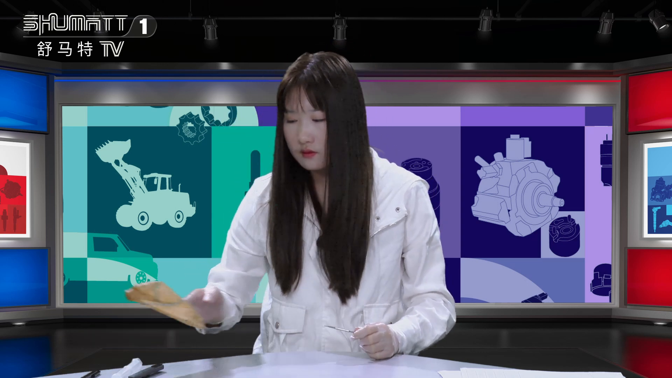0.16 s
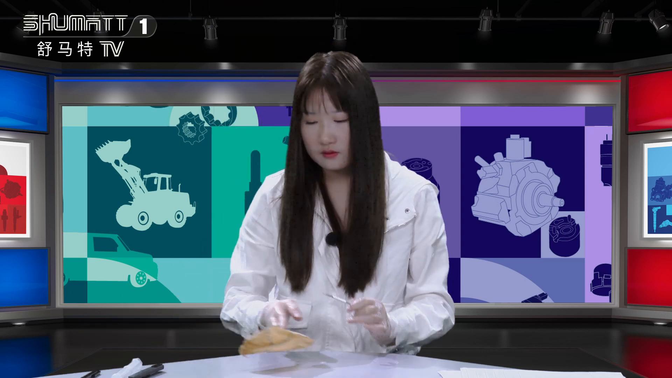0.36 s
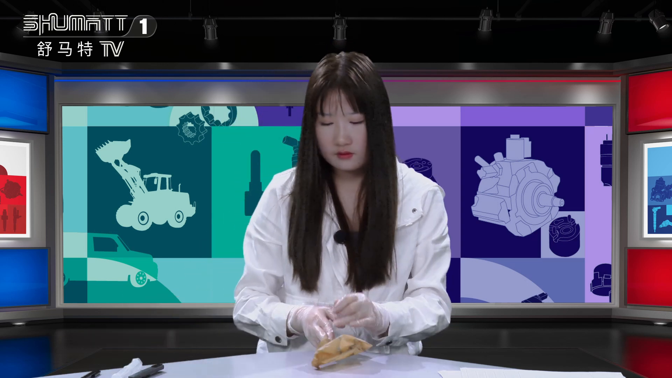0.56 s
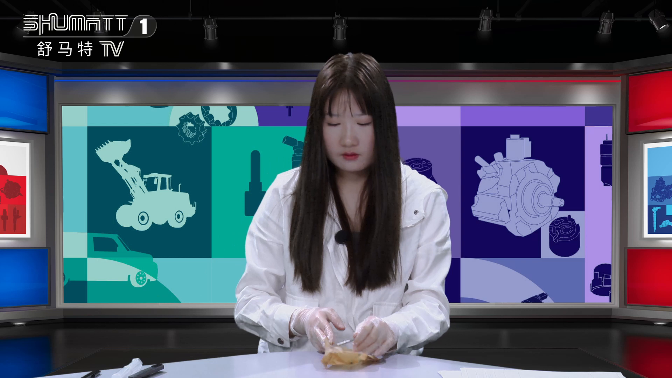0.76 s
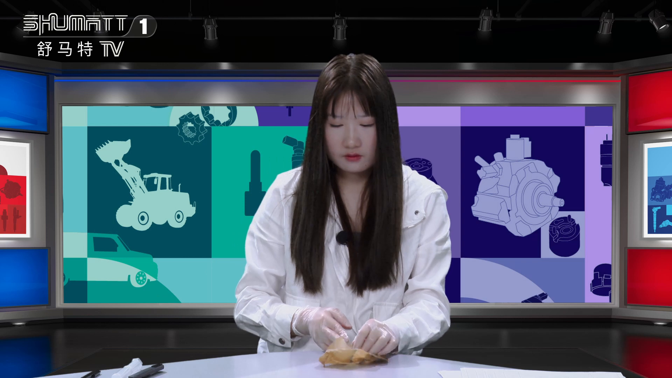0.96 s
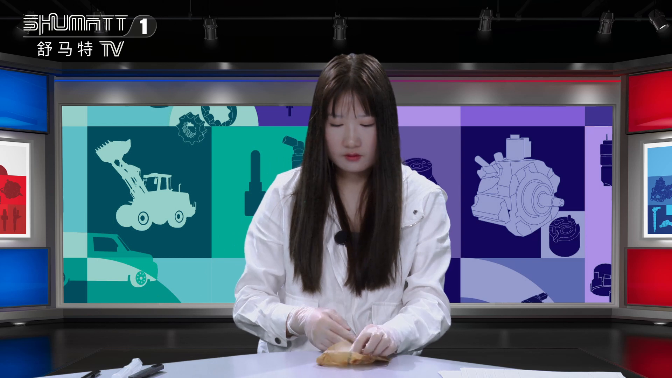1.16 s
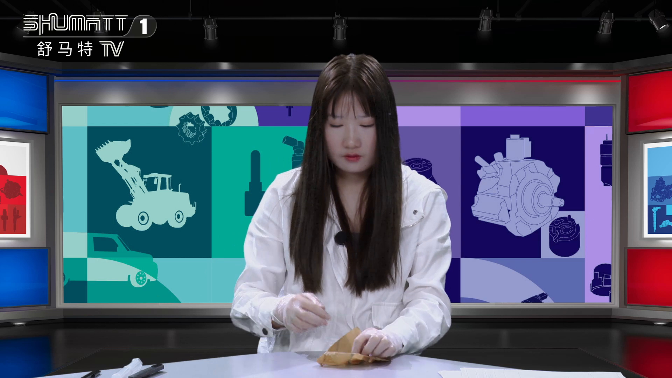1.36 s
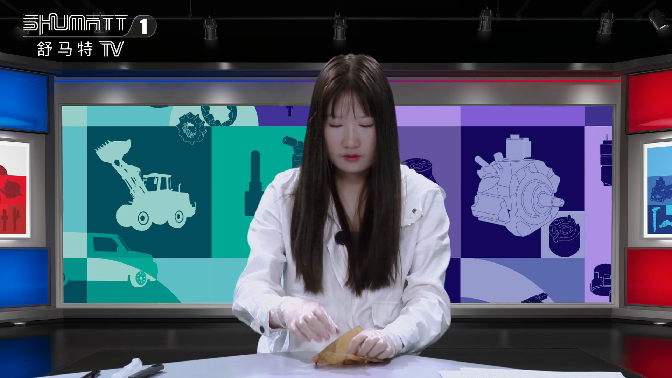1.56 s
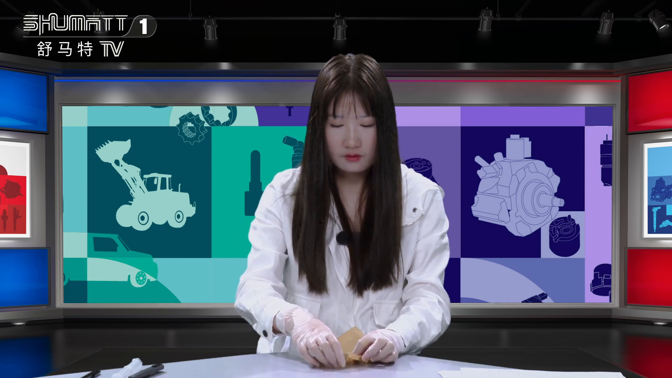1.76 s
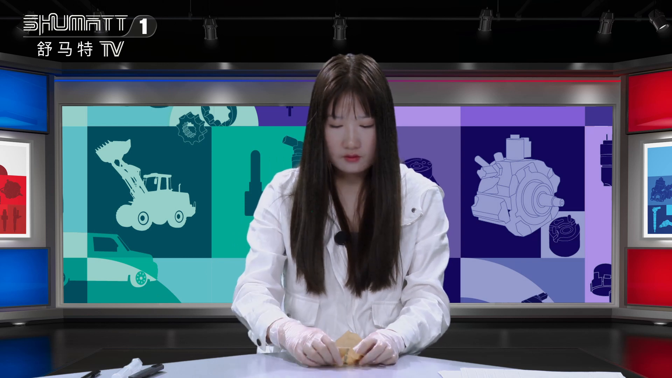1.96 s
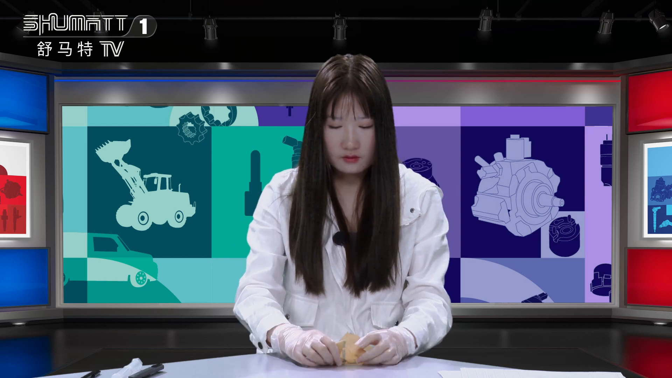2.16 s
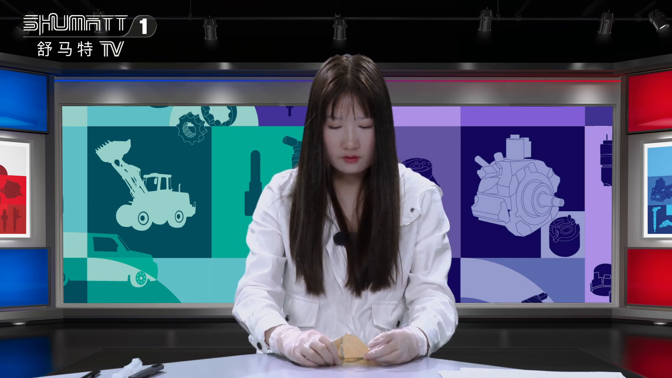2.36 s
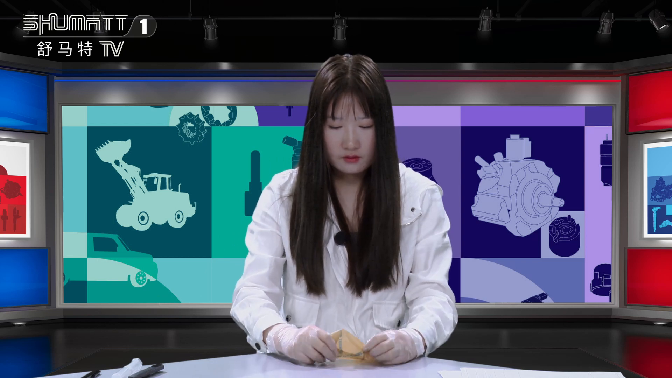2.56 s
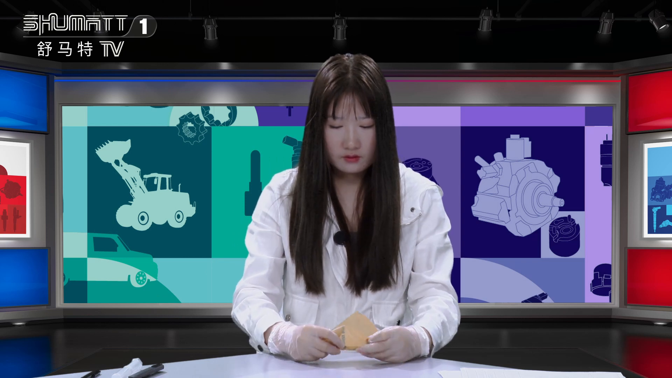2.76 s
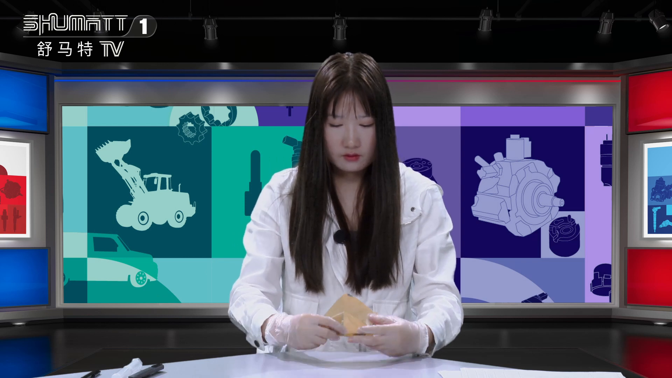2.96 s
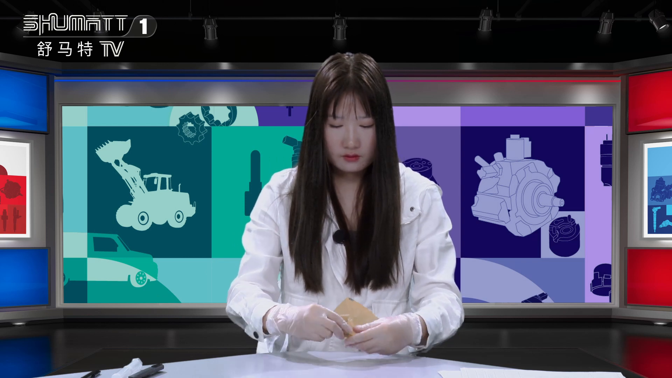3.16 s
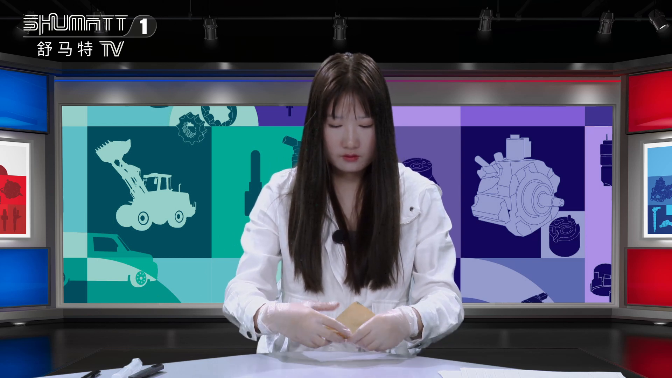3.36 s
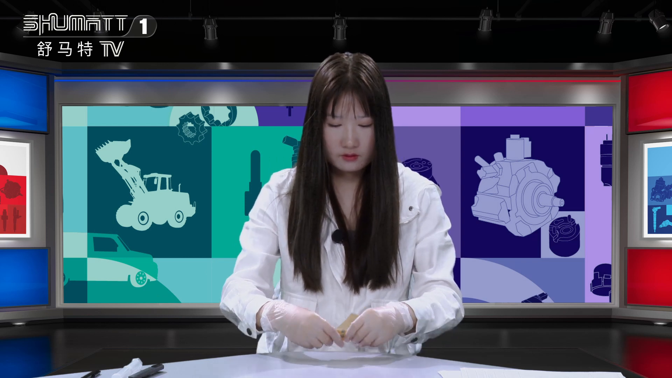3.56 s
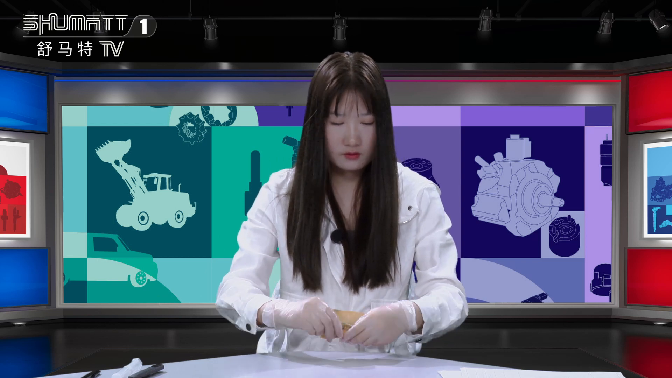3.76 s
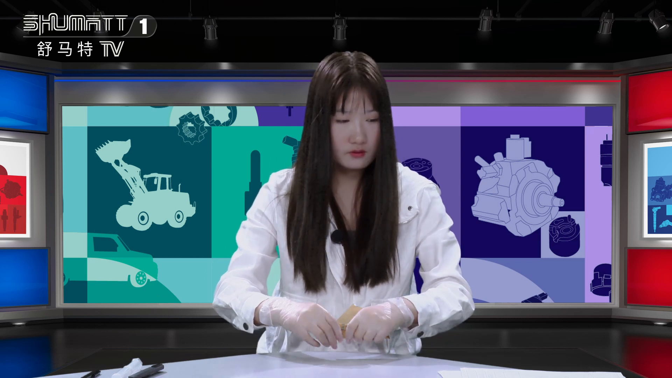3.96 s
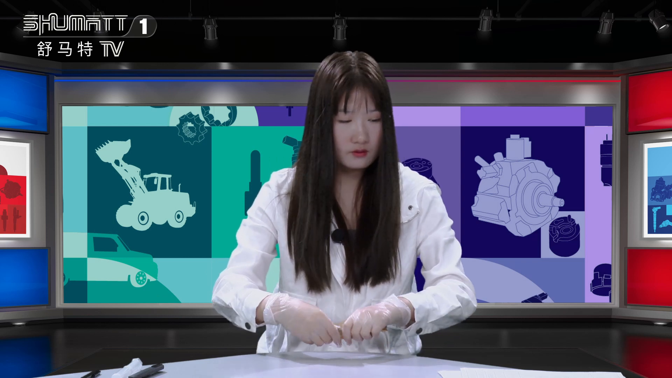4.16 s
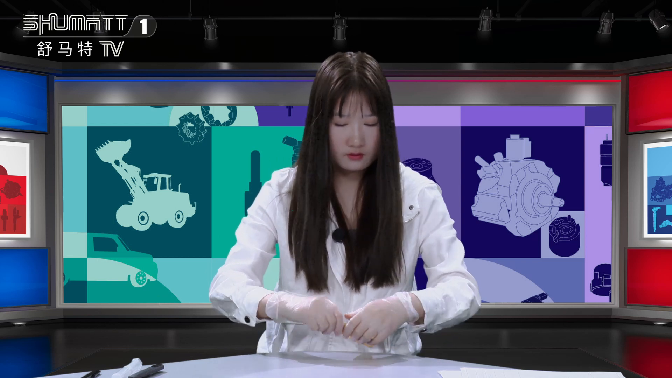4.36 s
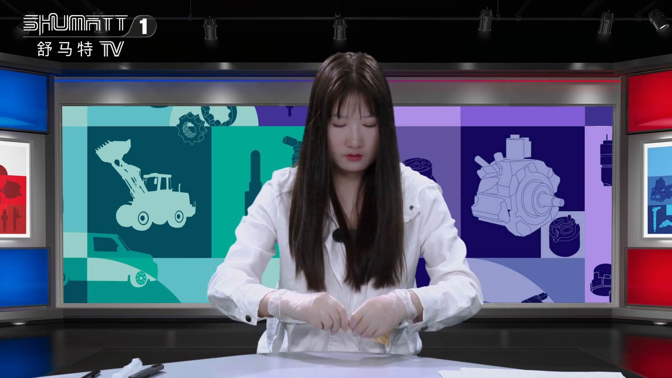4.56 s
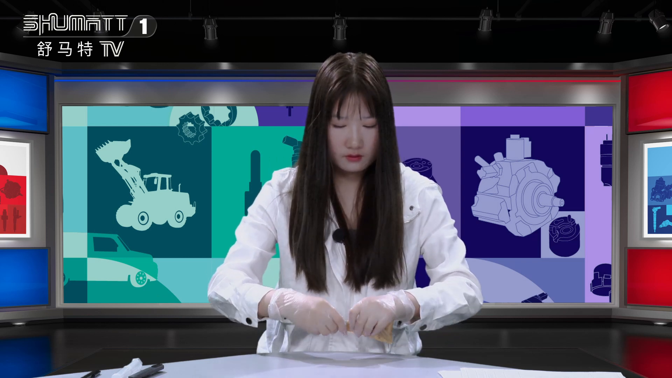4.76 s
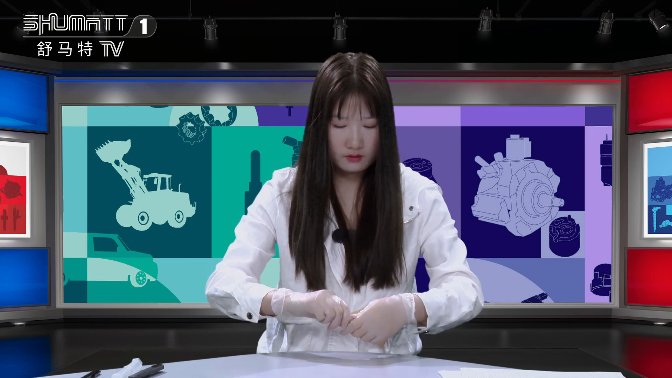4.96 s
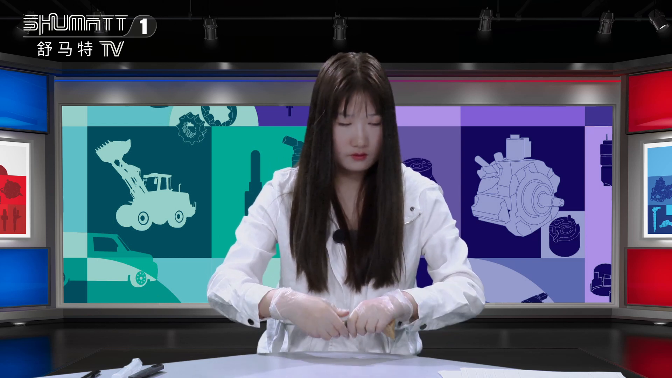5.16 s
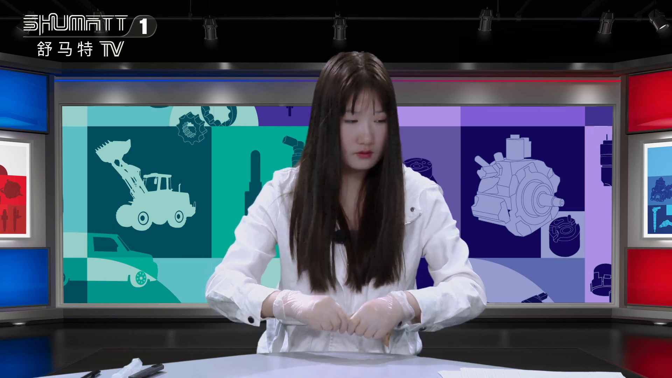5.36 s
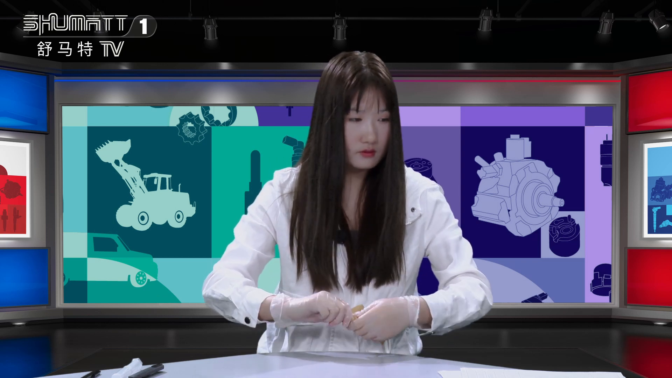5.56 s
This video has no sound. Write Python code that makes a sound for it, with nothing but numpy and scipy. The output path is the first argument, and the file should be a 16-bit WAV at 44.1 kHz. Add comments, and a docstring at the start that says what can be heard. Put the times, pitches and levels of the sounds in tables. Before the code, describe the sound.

Hands crease and fold stiff paper at a quiet indoor desk, starting nearly silent, then crackling, popping and rustling ever more densely up close.

```python
"""Stiff paper folded on a desk

Hands unwrap and fold stiff paper in a quiet, dry room, close to a small mono microphone.
Creases snap as noise-excited resonances, over a rustle of band-coloured hiss and tiny random crackles.
The sheet pops and flexes, knuckles bump the desk, and a fingertip rubs a fold as a gliding band of noise.
Close reflections colour the snaps, pops and bumps; faint room noise, bass-heavy hiss with a hum-like
peak near 50 Hz, rumbles behind."""
import sys
import numpy as np
from scipy import signal
from scipy.fft import rfft, irfft
from scipy.io import wavfile
from scipy.ndimage import uniform_filter1d

SR = 44100
rng = np.random.default_rng(int(sys.argv[2]) if len(sys.argv) > 2 else 0)


def gain_from_db(level_db):
    """Convert decibel levels to linear amplitude factors (20 dB per decade)."""
    decades = np.asarray(level_db, float) / 20
    return 10 ** decades


def to_wav(s):
    """Save 16-bit WAV."""
    ch = np.atleast_2d(s).T  # columns
    pcm = np.round(np.clip(ch, -1, 1) * 32767)  # PCM
    wavfile.write(sys.argv[1], SR, pcm.astype(np.int16))


N = 251370  # length [samples]

# loud creases that buckle, each level an rms over 4 ms before reflections:
# (time [s], panel ring [Hz], ring level [dB], crack centre [Hz], crack level [dB])
SNAPS = [(0.234, 2800, -55, 6000, -70), (0.427, 2200, -52.5, 6000, -66), (0.65, 3050, -33.5, 7200, -35),
         (0.6992, 1400, -44, 7160, -49), (0.7497, 1240, -40.5, 5870, -55), (0.7905, 1490, -41, 8360, -47),
         (0.837, 1530, -45.5, 8600, -56), (0.9808, 3600, -35.5, 7500, -38), (1.011, 2600, -24, 8700, -23),
         (1.1475, 2200, -35, 8100, -67), (1.1931, 3750, -43, 7100, -34.5), (1.2544, 1420, -39, 9100, -54),
         (1.3835, 3430, -43, 6030, -64), (1.6099, 1540, -46, 8650, -46), (1.6518, 890, -45, 6900, -46),
         (1.6703, 4940, -34, 12100, -28), (1.7184, 1510, -30, 5300, -24.5), (1.771, 2650, -30, 9600, -32),
         (1.8772, 2900, -38.5, 7900, -32.5), (1.9826, 3860, -29, 7300, -57),
         (2.164, 2900, -35.5, 13000, -45), (2.2049, 880, -36.5, 9400, -60),
         (2.3127, 1390, -30, 11300, -24.5), (2.4467, 1920, -46, 9900, -35), (2.5217, 1340, -31, 6000, -26),
         (2.5591, 1390, -28.5, 12000, -13.5), (2.5779, 3430, -22, 7200, -48),
         (2.5928, 1420, -31.5, 7200, -25.5), (2.625, 1540, -31.5, 10800, -51),
         (2.705, 2370, -30, 7600, -58), (2.757, 1980, -42, 10500, -33), (2.803, 3210, -57, 7900, -39),
         (2.848, 2300, -25, 6000, -38), (2.8918, 2530, -35.5, 6000, -34), (3.0084, 4000, -38, 6600, -60),
         (3.0338, 4330, -42, 8900, -35), (3.0675, 3100, -29, 7900, -26.5), (3.1837, 900, -57, 7760, -29),
         (3.1916, 4160, -35.5, 9300, -40), (3.2, 3600, -27.5, 10000, -26), (3.2296, 1010, -26.5, 6900, -53),
         (3.2792, 2670, -27.5, 6200, -31), (3.282, 2930, -33, 7540, -24.5),
         (3.2868, 4300, -31.5, 7400, -45), (3.3146, 3650, -28, 14400, -26.5),
         (3.3756, 1180, -33.5, 10500, -28.5), (3.3965, 4240, -26, 11000, -25),
         (3.458, 4180, -38.5, 5600, -52), (3.493, 4900, -47, 5800, -35.5), (3.5315, 1800, -40, 7700, -42),
         (3.5604, 3440, -24.5, 9800, -22), (3.5682, 4280, -24, 6100, -44),
         (3.6124, 5000, -28, 12300, -18.5), (3.6427, 3200, -20.5, 9400, -16.5),
         (3.6476, 1510, -25.5, 7440, -24.5), (3.6814, 3830, -30.5, 9800, -43),
         (3.6883, 1310, -28, 9500, -30.5), (3.7244, 1590, -31, 10600, -33.5),
         (3.792, 4800, -26.5, 6250, -43), (3.7973, 3900, -32.5, 7900, -50), (3.915, 5000, -55, 9050, -26.5),
         (3.931, 4020, -31, 8100, -26), (3.9428, 2880, -19.5, 7000, -15), (4.009, 4070, -50, 11600, -28.5),
         (4.0364, 2700, -37, 10100, -51), (4.0921, 3670, -38, 9000, -55), (4.1696, 1660, -30.5, 9400, -35),
         (4.1893, 1130, -33, 5800, -34), (4.2069, 3700, -22.5, 6900, -27), (4.231, 1680, -32.5, 6100, -52),
         (4.3394, 3700, -32, 9700, -48), (4.3634, 4700, -35.5, 9600, -31.5), (4.424, 1530, -42, 7300, -38),
         (4.5042, 1560, -23.5, 9200, -43), (4.5116, 4100, -19.5, 12100, -16.5),
         (4.537, 1240, -30, 8300, -42), (4.5425, 1370, -34, 5800, -32), (4.582, 3580, -50, 12300, -28.5),
         (4.6055, 1290, -32.5, 6500, -44), (4.6185, 3940, -34, 9650, -33), (4.656, 4180, -25.5, 6200, -47),
         (4.6611, 1320, -23.5, 10700, -14), (4.6783, 4200, -22.5, 7960, -21),
         (4.7004, 2570, -21, 8160, -20), (4.7369, 3700, -25, 11200, -21.5), (4.748, 4370, -25, 6900, -25),
         (4.765, 2690, -36, 5700, -51), (4.7728, 3180, -20.5, 13300, -18), (4.7831, 1440, -31, 8600, -30),
         (4.788, 2880, -24.5, 7500, -42), (4.7953, 3670, -20, 10200, -17), (4.835, 2900, -26.5, 9800, -49),
         (4.842, 3510, -36, 10500, -28), (4.8766, 3460, -32, 11800, -25), (4.9483, 1490, -34.5, 6800, -33),
         (4.9672, 3800, -29, 7000, -23.5), (5.01, 4300, -27, 7100, -23.5), (5.043, 1210, -33.5, 5570, -35),
         (5.0934, 3700, -21.5, 6200, -45), (5.1432, 1280, -34.5, 7150, -37),
         (5.1589, 4200, -24.5, 6100, -37), (5.1852, 3200, -21.5, 11700, -21), (5.203, 3050, -32, 6100, -48),
         (5.243, 3920, -31, 8400, -34), (5.2577, 4730, -22.5, 7760, -19.5),
         (5.2727, 2030, -27.5, 5900, -46), (5.326, 3030, -37, 7300, -34.5), (5.347, 3770, -41, 5860, -31.5),
         (5.3617, 3900, -39, 8100, -36), (5.4229, 3350, -21, 10200, -26), (5.4627, 2080, -28, 9600, -39),
         (5.4783, 2220, -34.5, 7700, -52), (5.508, 4400, -28.5, 9800, -23.5),
         (5.6722, 2400, -36.5, 7900, -47), (5.6966, 3800, -24, 7600, -53)]
# the whole sheet pops in or out of shape, level as above: (time [s], pitch [Hz], level [dB])
POPS = [(0.6883, 170, -44.5), (0.7802, 320, -41), (1.012, 750, -37.5), (1.226, 348, -35),
        (1.4559, 410, -44), (1.72, 483, -34), (1.7729, 382, -35.5), (1.8786, 410, -40.5),
        (2.1655, 980, -36), (2.2063, 665, -47), (2.3163, 610, -30.5), (2.451, 636, -34.5),
        (2.4635, 553, -35.5), (2.524, 555, -26), (2.8981, 590, -40), (3.1865, 696, -27.5),
        (3.1999, 800, -29), (3.2316, 780, -30.5), (3.2881, 646, -34), (3.5633, 430, -34), (3.641, 764, -31),
        (3.6892, 640, -32.5), (3.7258, 920, -39), (3.7677, 760, -39), (4.0933, 506, -42), (4.208, 620, -29),
        (4.424, 470, -35.5), (4.5133, 550, -22.5), (4.6615, 670, -23.5), (4.699, 474, -34),
        (4.949, 710, -35.5), (4.992, 694, -32), (5.0446, 554, -40.5), (5.4255, 546, -35.5)]
# rustle spectrum as heard: paper colour, then a steep treble cutoff from 16 kHz that is not the paper's:
# (frequency [Hz], relative density [dB per Hz])
RUSTLE_SPECTRUM = [(410, -40), (700, -27), (889, -5), (1410, 6), (2020, -1.5), (2780, 4.5), (3920, 3.5),
                   (6760, 0), (8470, -4), (15000, -1.5), (16000, -27), (16600, -54)]

BURST_SIZE, LEAD_S = 1024, .004  # burst length [samples]; time in it before the slip peaks [s]
PATCHY_DB = 3.5  # rms unevenness of the paper hisses over time and frequency [dB]


def evened(x):
    """Normalization: scales a signal to unit rms."""
    return x / np.sqrt(np.mean(x ** 2) + 1e-20)


def wander(samples):
    """Smoothed noise: a slow random drift of unit rms, averaged over the given samples."""
    return evened(uniform_filter1d(rng.standard_normal(N), samples))


def colour(x, points):
    """Linear filtering: weights a spectrum by levels interpolated over log frequency."""
    hz, db = np.transpose(points)
    bins = np.fft.rfftfreq(len(x), 1 / SR)
    gain_db = np.interp(np.log(bins + 1), np.log(hz + 1), db)
    return irfft(rfft(x) * gain_from_db(gain_db), len(x))


def hiss(points, patchy_db):
    """Coloured noise: random short-time spectra with drifting patches, filtered and set to unit rms."""
    frames = N // 128 + 8
    a, b, patches = rng.standard_normal((frames, 257, 3)).T
    patches = uniform_filter1d(patches, 10, 0)  # across frequency
    patches = evened(uniform_filter1d(patches, 14, 1))  # across time
    spectra = (a + 1j * b) * gain_from_db(patchy_db * patches)
    white = signal.istft(spectra, nperseg=512, noverlap=384)[1][:N]
    return evened(colour(white, points))


def burst(hz, q, rise_s, slip_s, db):
    """Excited resonance, one row an event: noise swells, dies and rings; db is the rms over 4 ms."""
    t = np.arange(BURST_SIZE) / SR - LEAD_S
    envelope = np.exp(np.where(t < 0, t / rise_s, -t / slip_s))
    slip = rng.standard_normal((len(hz), BURST_SIZE)) * envelope
    u = np.fft.rfftfreq(BURST_SIZE, 1 / SR) / np.asarray(hz)[:, None]
    band = 1j * u / q / (1 - u ** 2 + 1j * u / q)
    rung = irfft(rfft(slip) * band ** 2)  # two equal resonances in series
    gain = gain_from_db(db) * np.sqrt(0.004 * SR) / np.linalg.norm(rung, axis=1)
    return rung * gain[:, None]


def place(s, sounds):
    """Superposition: adds each burst so that its slip peaks at its time."""
    out = np.zeros(N + BURST_SIZE)
    starts = np.round((s - LEAD_S) * SR).astype(int)
    np.add.at(out, starts[:, None] + np.arange(BURST_SIZE), sounds)
    return out[:N]


def around(s, db, build_s, relax_s):
    """Exponential build-up and relaxation: a gain around each event, summed as power."""
    t = np.arange(-4000, 8001) / SR
    power = np.zeros(N)
    np.add.at(power, np.round(s * SR).astype(int), gain_from_db(db) ** 2)
    shape = np.exp(np.where(t < 0, t / build_s, -t / relax_s))
    return np.sqrt(abs(signal.oaconvolve(power, shape)[4000:4000 + N]))  # abs guards rounding errors


def room_noise():
    """Stationary background noise: faint bass-heavy hiss with a narrow hum-like peak near 50 Hz."""
    # relative spectrum of the room noise, hum included: (frequency [Hz], density [dB per Hz])
    room_spectrum = [(24, -21), (38, -8.5), (50, 6.5), (65, -3), (240, -5.5), (440, -17.5), (660, -32.5),
                     (1300, -24.5), (2800, -25.5), (4700, -35), (15000, -43)]
    return gain_from_db(-55.5) * hiss(room_spectrum, patchy_db=1.0)


def handling():
    """Work input of the hands: rustle, treble and flexing gains [dB] at every sample."""
    # how hard the hands work the paper: (time [s], rustle gain [dB], sheet flexing gain [dB])
    hands = [(0, -93, -65), (.3, -63, -58), (.5, -64, -60.5), (.56, -55.5, -57), (.72, -59.5, -55.5),
             (.93, -49, -51.5), (1.2, -40, -46), (1.47, -48.5, -47.5), (1.7, -43, -43), (1.9, -45, -45),
             (2.1, -43, -51), (2.27, -48.5, -47), (2.5, -40, -40), (2.72, -47.5, -47.5), (3.05, -45.5, -40),
             (3.37, -35, -43), (3.75, -37, -50), (4.1, -38.5, -46), (4.34, -33, -47), (4.57, -39.5, -44),
             (4.75, -35.5, -42), (4.95, -39.5, -51), (5.33, -42, -51), (5.7, -42.5, -53.5)]
    # the hands hold still: (start [s], length [s], drop [dB])
    pauses = [(0.859, 0.04, 7), (1.271, 0.11, 8.5), (1.518, 0.14, 13), (1.804, 0.052, 12.5),
              (2.345, 0.083, 5), (3.078, 0.12, 19.5), (3.229, 0.037, 9), (3.405, 0.12, 16.5),
              (4.048, 0.037, 14), (4.245, 0.028, 4), (4.368, .11, 9.5), (4.99, 0.035, 10),
              (5.209, 0.026, 8), (5.504, .15, 2.5)]
    stop_s, start_s = 0.012, 0.011  # ramps into and out of a pause
    flex_rests, treble_rests = 0.74, 0.77  # shares of the drop that flexing and treble follow
    t = np.arange(N) / SR
    rest_db = np.zeros(N)
    for start, length, db in pauses:
        ramp = np.minimum((t - start) / stop_s, (start + length - t) / start_s)
        rest_db += db * np.clip(ramp + .5, 0, 1)
    s, *columns = np.transpose(hands)
    rustle_db, flex_db = (np.interp(t, s, c) for c in columns)
    # a positive tilt gives back part of the drop to the treble
    return rustle_db - rest_db, (1 - treble_rests) * rest_db, flex_db - flex_rests * rest_db


def crackle(per_s, spread_db, count=32):
    """Crackling noise: tiny random creases of many sizes, in clumps a few milliseconds long."""
    shapes = burst(np.geomspace(700, 14000, count), 1.43, 0.00004, 0.00024, np.zeros(count))
    clump = gain_from_db(6.5 * wander(350))
    size = gain_from_db(spread_db * np.minimum(rng.exponential(1, N), 4))
    size = size * (rng.random(N) < per_s * clump / SR)
    which = rng.integers(0, count, N)
    grains = sum(signal.oaconvolve(size * (which == k), shape)[:N] for k, shape in enumerate(shapes))
    # flatten the broad spectrum before colouring it
    spectrum = rfft(grains)
    power = uniform_filter1d(abs(spectrum) ** 2, 3000)
    return evened(colour(irfft(spectrum / np.sqrt(power), N), RUSTLE_SPECTRUM))


def rustle():
    """Friction and crumpling noise: hiss and crackle follow the hands; the whole sheet flexes below."""
    # relative spectrum of the flexing sheet: (frequency [Hz], density [dB per Hz])
    flex_spectrum = [(80, -1.5), (200, -2), (350, 0.5), (650, 0.5), (1000, -6), (1600, -13.5)]
    flicker_db, flicker_s = 2, .03  # the balance of treble and body wanders
    s, _, ring_db, _, crack_db = np.transpose(SNAPS)
    at, _, pop_db = np.transpose(POPS)
    rustle_db, tilt_db, flex_db = handling()

    # paper rustles up around each loud crease, and the sheet flexes around each pop
    strain = around(s, np.maximum(ring_db, crack_db) - 12.5, build_s=0.0033, relax_s=0.0082)
    wobble = around(at, pop_db - 13.5, build_s=0.0061, relax_s=0.01)
    level = np.hypot(gain_from_db(rustle_db), strain)
    flex = np.hypot(gain_from_db(flex_db), wobble)

    grip = gain_from_db(2.86 * wander(500))  # finger pressure wavers
    sliding = gain_from_db(-6.0) * hiss(RUSTLE_SPECTRUM, PATCHY_DB) * grip
    paper = sliding + gain_from_db(-7.0) * crackle(per_s=2600, spread_db=5.6)

    tilt_db = tilt_db + flicker_db * wander(round(flicker_s * SR))
    body = signal.sosfiltfilt(signal.butter(2, 5000, fs=SR, output="sos"), paper)
    paper = body + (paper - body) * gain_from_db(tilt_db)
    return level * paper + flex * hiss(flex_spectrum, PATCHY_DB) * grip ** 0.57


def ticks(count=400):
    """Random point process: lesser creases whose level follows the hands; columns as in SNAPS."""
    per_s, over_rustle_db, spread_db = 18, 4, 3  # approximate rate; base level; exponential spread
    sliding_db = -42.5  # above this rustle gain the paper slides and these creases grow no further
    when, keep, ring, crack, size, share = rng.random((count, 6)).T
    s = .01 + when * (N / SR - .04)
    rustle_db = handling()[0][(s * SR).astype(int)]
    db = np.minimum(rustle_db, sliding_db) + over_rustle_db
    db = db - spread_db * np.log(np.maximum(size, .15))
    db = np.where(keep < per_s * N / SR / count, db, -200)  # the unused candidates are inaudible
    ring_hz, crack_hz = 1000 * 5 ** ring, 5500 * 2.7 ** crack
    return np.transpose([s, ring_hz, db - 14 * share, crack_hz, db - 14 * (1 - share)])


def snaps():
    """Buckling instability: a crease rings a small panel and cracks, inside a softer creep and scatter."""
    s, ring_hz, ring_db, crack_hz, crack_db = np.vstack([SNAPS, ticks()]).T
    creep_s = .0006  # slower rise of the soft parts
    sound = burst(ring_hz, 1.52, 0.00031, 0.00023, ring_db)
    sound += burst(crack_hz, 1.0, .0001, 0.001, crack_db)
    sound += burst(ring_hz, 0.4, creep_s, 0.0018, ring_db - 3)
    sound += burst(crack_hz, 0.3, creep_s, 0.0013, crack_db - 29.5)
    return place(s - .0002, sound)


def pops():
    """Snap-through of a curved sheet: a brief slip rings one low, heavily damped resonance."""
    s, hz, db = np.transpose(POPS)
    return place(s - .0025, burst(hz, 1.26, 0.00018, 0.0023, db))  # slips 2.5 ms before the listed time


def bumps():
    """Impact on a damped body: knuckles knock dull, broad low bursts from the desk top."""
    # knuckles bump the desk, rms over 4 ms before reflections: (time [s], level [dB])
    knocks = [(0.779, -39.5), (1.654, -35.5), (1.718, -33.5), (2.312, -31), (3.186, -36), (4.51, -36),
              (4.703, -35), (4.795, -43)]
    s, db = np.transpose(knocks)
    return place(s, burst(np.full(len(s), 135.), 0.3, 0.00039, 0.00076, db))


def nearby(x):
    """Early reflection: delayed copies comb-filter the direct sound, at unit total tap energy."""
    # hands, desk top, chest: (delay [s], level relative to the direct sound [dB])
    echoes = [(.0003, -20), (.00075, -18), (.0018, -27)]
    taps = np.zeros(256)
    taps[0] = 1
    for s, db in echoes:
        taps[round(s * SR)] = gain_from_db(db)
    return signal.oaconvolve(x, taps / np.linalg.norm(taps))[:N]


def rub(width_hz):
    """Cavity resonance: friction noise in the hollow of a fold, gliding as the hollow changes size."""
    # a fingertip drags along a fold: (time [s], hollow resonance [Hz], level [dB])
    drag = [(2.058, 1510, -71), (2.08, 1343, -46), (2.11, 974, -50), (2.134, 865, -48), (2.165, 920, -53),
            (2.191, 870, -60)]
    s, hz, db = np.transpose(drag)
    t = np.arange(N) / SR
    r = np.exp(-np.pi * width_hz / SR)
    # narrow complex noise, shifted up to the moving resonance
    slow = signal.lfilter([1 - r], [1, -r], rng.standard_normal((N, 2)) @ [1, 1j])
    phase = 2 * np.pi * np.cumsum(np.interp(t, s, hz)) / SR
    band = evened((slow * np.exp(1j * phase)).real)
    return band * gain_from_db(np.interp(t, s, db)) * (t > s[0]) * (t < s[-1])


def scene():
    """Superposition of all sources, equal on both channels."""
    struck = nearby(snaps() + pops() + bumps())
    mono = room_noise() + rustle() + struck + rub(width_hz=85)
    return np.array([mono, mono])


def roll_off(x):
    """The treble ends steeply here."""
    return signal.sosfilt(signal.butter(12, 16800, fs=SR, output="sos"), x)


def record(dry):
    """Amplitude and band limiting: peaks clip at full scale, then a steep low-pass at 16450 Hz."""
    edge = signal.firwin(401, 16450, window=("kaiser", 8), fs=SR)
    mix = signal.oaconvolve(np.clip(dry, -1, 1), edge[None], "same")
    return roll_off(mix)


dry = scene()
out = record(dry)
to_wav(out)
```